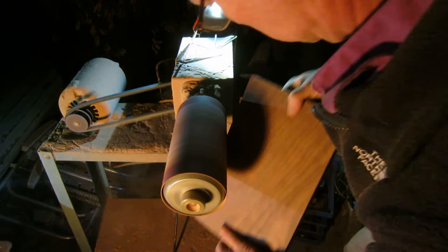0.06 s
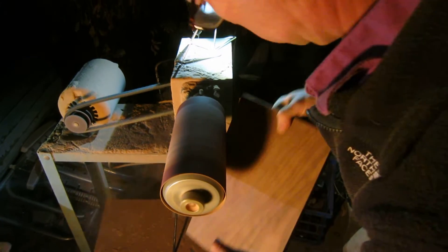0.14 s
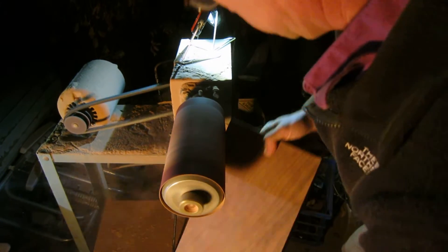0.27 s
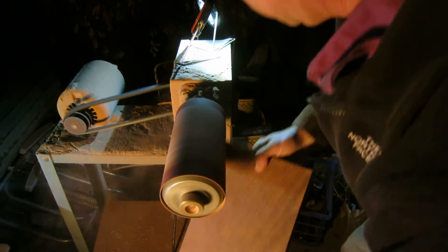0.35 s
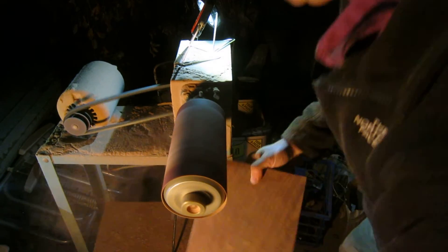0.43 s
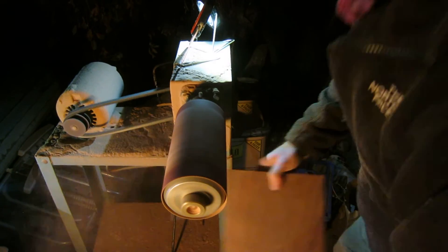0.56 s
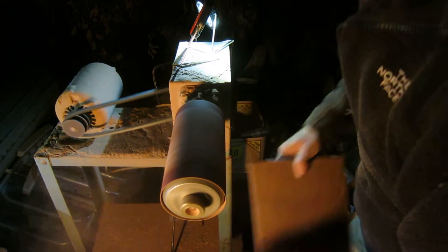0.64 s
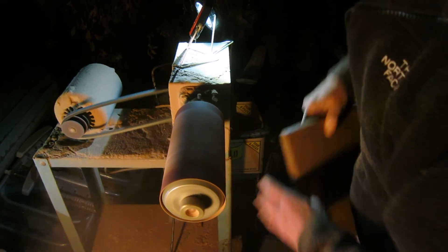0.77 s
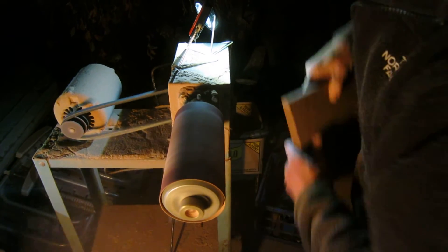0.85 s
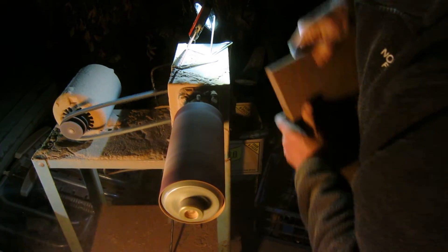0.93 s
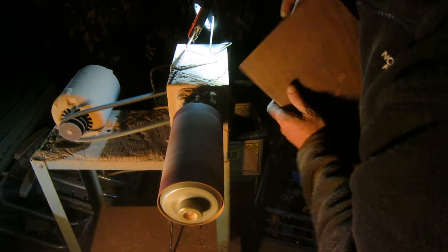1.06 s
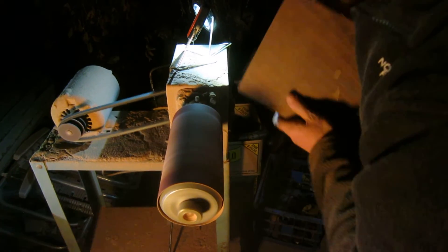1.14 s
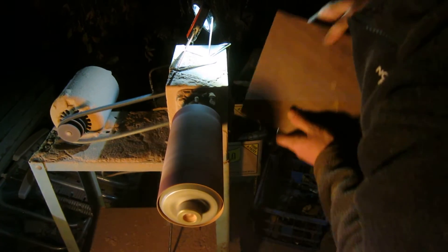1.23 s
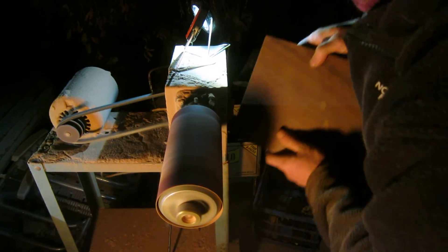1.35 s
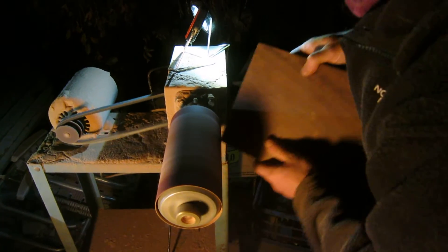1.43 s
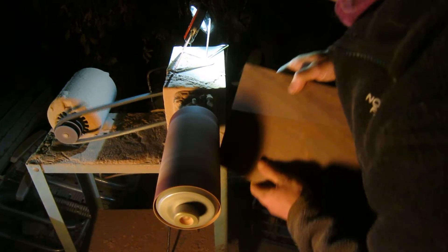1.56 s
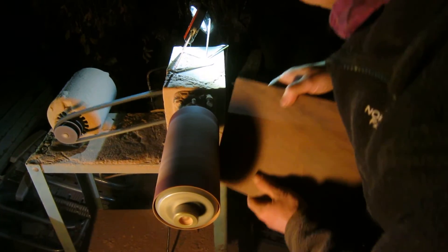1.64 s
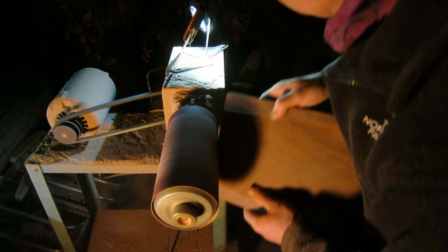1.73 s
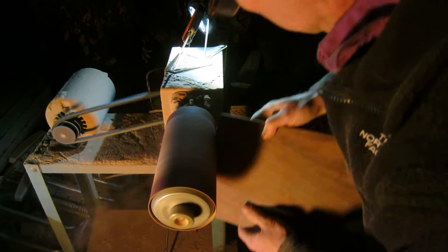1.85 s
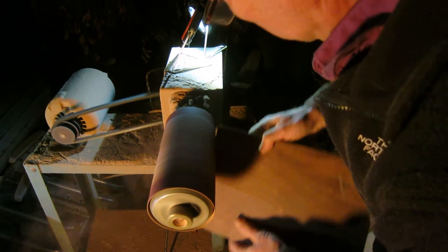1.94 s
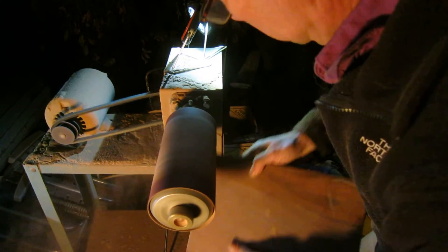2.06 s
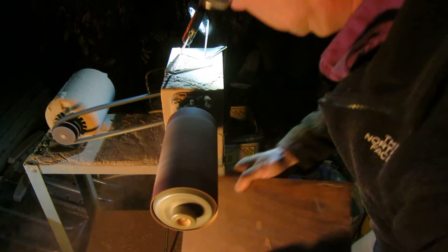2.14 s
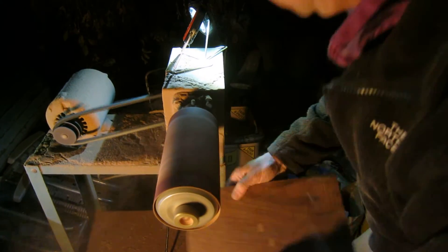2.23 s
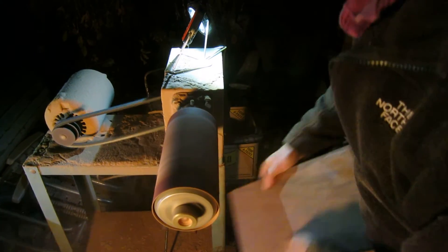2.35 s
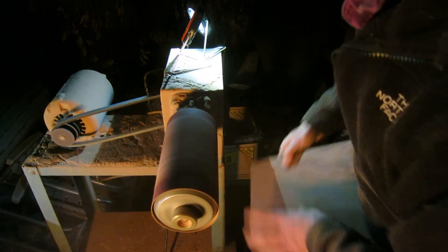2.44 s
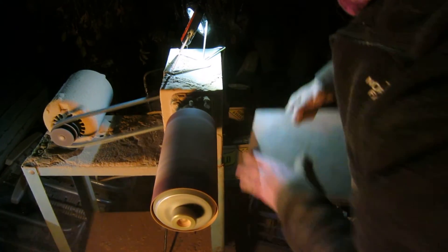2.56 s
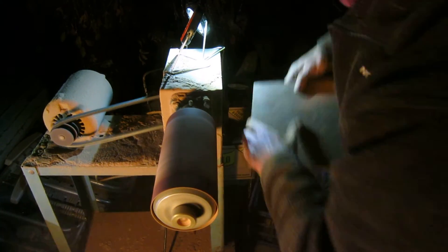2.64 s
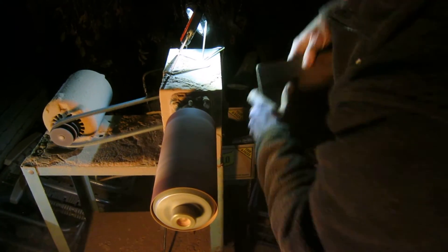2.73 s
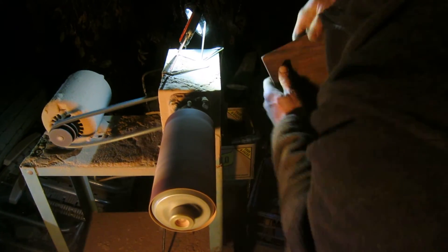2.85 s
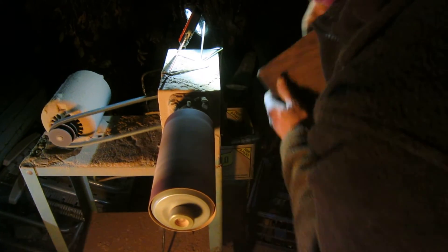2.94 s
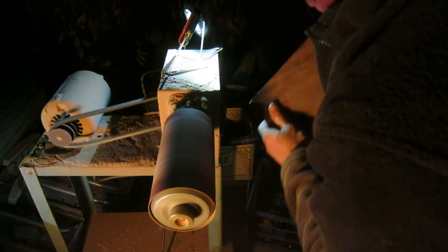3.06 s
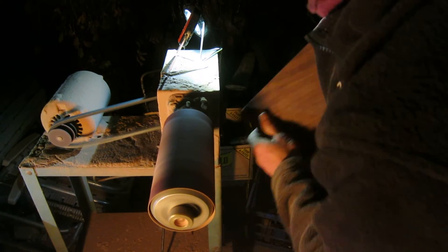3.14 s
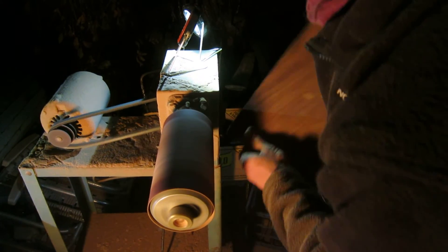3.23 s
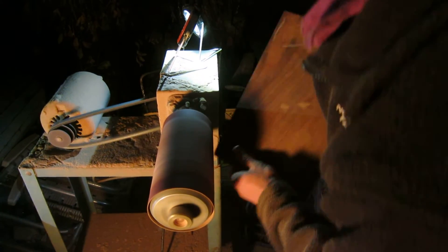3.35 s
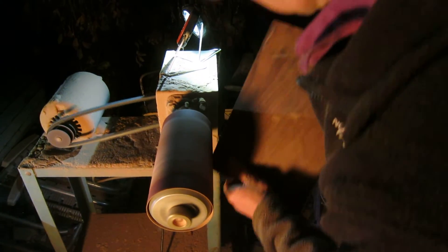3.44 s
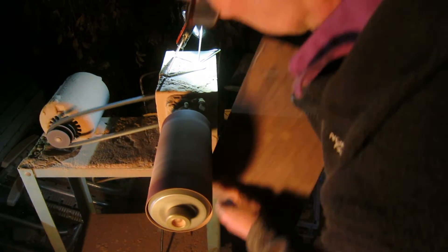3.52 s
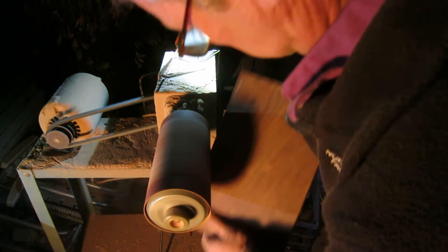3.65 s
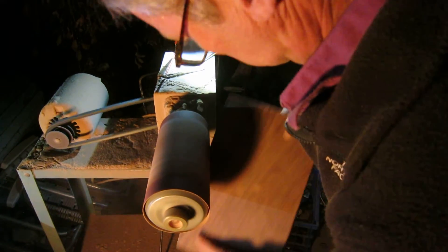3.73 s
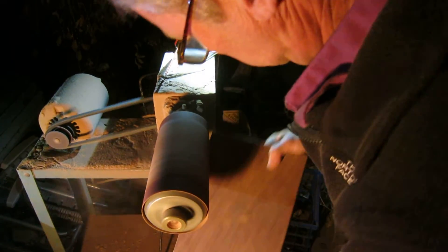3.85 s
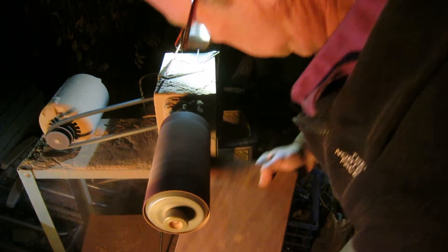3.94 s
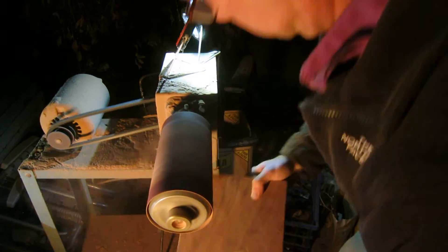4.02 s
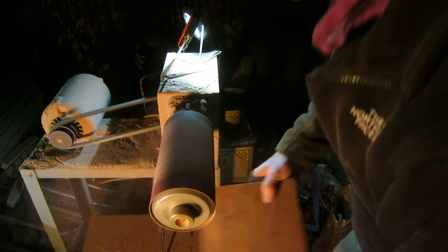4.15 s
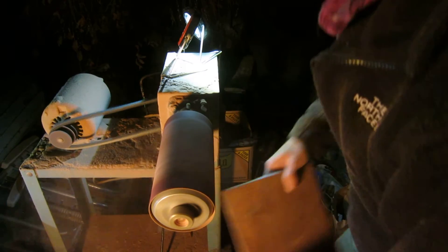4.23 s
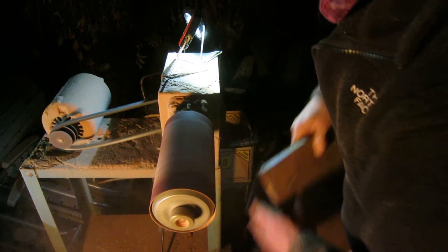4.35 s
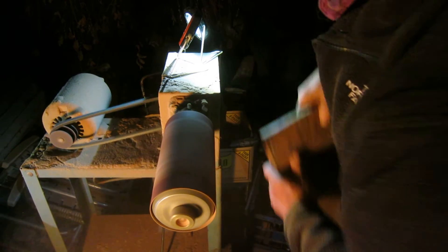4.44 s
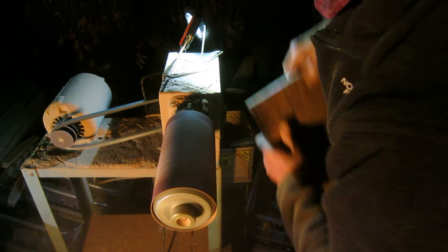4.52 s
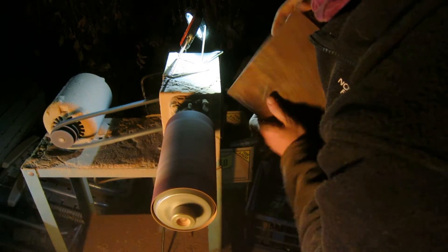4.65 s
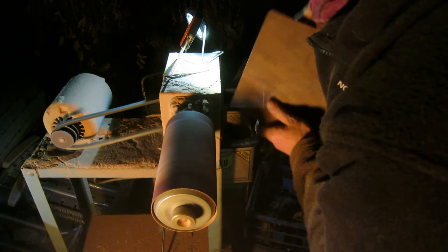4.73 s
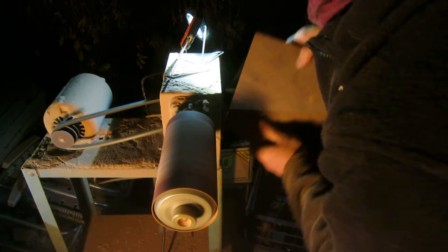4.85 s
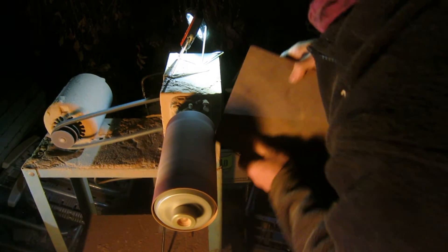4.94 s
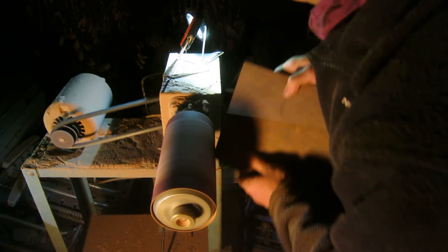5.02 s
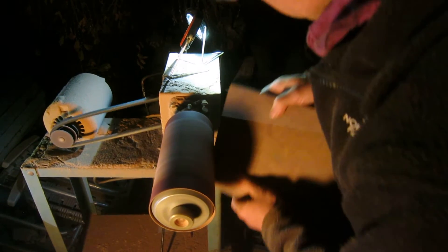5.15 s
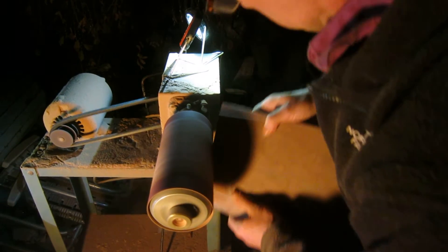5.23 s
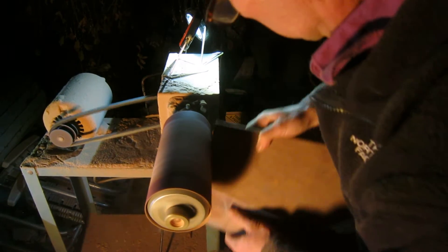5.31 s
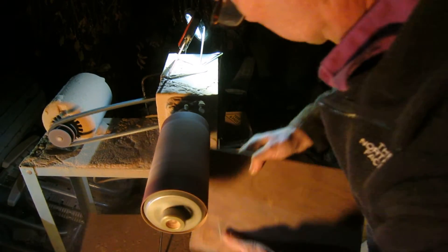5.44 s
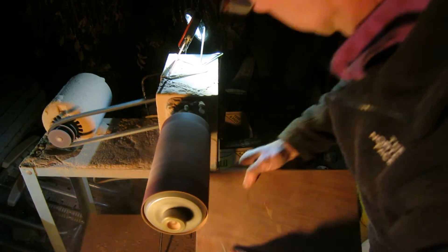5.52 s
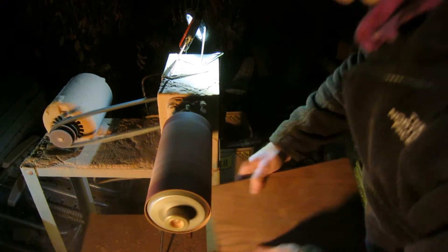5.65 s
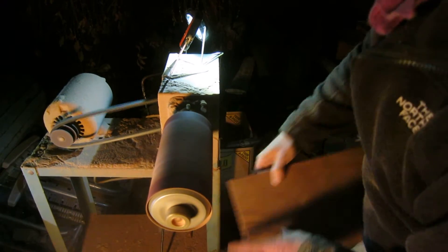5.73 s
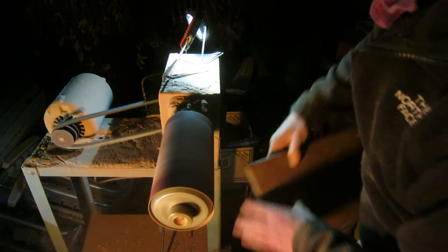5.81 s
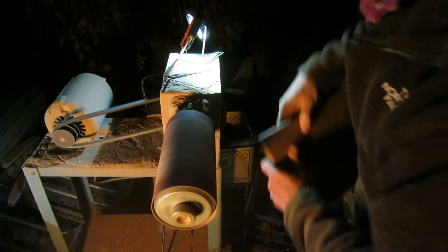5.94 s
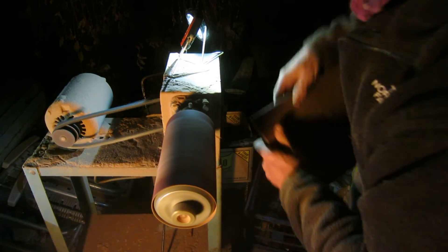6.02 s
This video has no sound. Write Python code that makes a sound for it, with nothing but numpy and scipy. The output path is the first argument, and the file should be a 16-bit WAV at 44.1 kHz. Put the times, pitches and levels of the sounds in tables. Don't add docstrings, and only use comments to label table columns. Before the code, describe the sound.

Close by in the open air, a belt-driven sanding drum rattles and hums steadily. A stroke already under way rasps harshly on a wooden board and stops; three more bright, tearing strokes of about half a second follow at intervals. Between them the machine's knocking frame, belt slaps and airy whirr come forward, with small dry ticks of fingers on the board. The recorder's level dips under each stroke and slowly recovers.

```python
import sys
import numpy as np
from scipy import signal
from scipy.fft import rfft, irfft
from scipy.io import wavfile
from scipy.ndimage import uniform_filter1d

SR = 44100
rng = np.random.default_rng(int(sys.argv[2]) if len(sys.argv) > 2 else 0)


def generate_wav(signal):
    frames = np.transpose(np.atleast_2d(signal))
    scaled = np.clip(frames, -1, 1) * 32767
    pcm = np.round(scaled).astype(np.int16)
    wavfile.write(sys.argv[1], SR, pcm)


def volts_from_db(level):
    exponent = np.asarray(level, float) / 20
    return 10 ** exponent


N = 268168
COARSE = np.arange(0, N, 64)

# time in seconds, grit level in dB, rasp centre in Hz.
STROKES = [
    [(0.0, -16.5, 5000), (0.09, -18.5, 5240), (0.14, -17, 5270), (0.3, -17.5, 4550), (0.365, -18.5, 4480),
     (0.4, -28.5, 4600), (0.44, -34.5, 5000), (0.449, -43, 5000)],
    [(1.522, -18, 5370), (1.54, -19, 5400), (1.645, -17.5, 5450), (1.76, -21, 4800), (1.84, -16.5, 4480),
     (2.028, -17, 4900), (2.088, -26, 4830), (2.168, -39, 5130), (2.185, -73, 4850)],
    [(3.388, -29, 4880), (3.452, -23.5, 5400), (3.5, -16, 5350), (3.54, -19, 5270), (3.872, -16, 4850),
     (3.962, -19, 3800), (3.99, -31, 3820), (4.072, -41.5, 4390), (4.11, -71, 3940)],
    [(5.027, -25.5, 5190), (5.049, -23.5, 5400), (5.13, -17, 5200), (5.213, -16, 5100), (5.34, -20, 4200),
     (5.43, -19, 4540), (5.495, -23, 4400), (5.531, -37, 5100), (5.543, -51, 5010)],
]
# start in seconds, length in seconds, grit level in dB, rasp centre in Hz.
BOUNCES = [
    (0.454, 0.031, -36, 5380),
    (1.461, 0.048, -19.5, 5200),
    (4.951, 0.052, -22, 4700),
    (5.553, 0.022, -37, 3740),
]
# from time in seconds, boom in dB, mid ring in dB, top hiss in dB,
# top lost along the pass in dB.
PASSES = [
    (0, 0.7, -.1, -3.5, -8),
    (1.0, -0.1, 0.7, -0.4, 6),
    (2.8, -0.2, 1.8, -1.4, 9.5),
    (4.5, 1.5, 1.3, -0.6, 4),
]
# frequency in Hz, level in dB per Hz.
GRIT_SPECTRUM = [(350, -51), (600, -38), (660, -6.5), (917, -4.5), (1440, -4.5), (1920, -7.5), (2390, -3.5),
                 (2630, -4), (3320, -2.5), (5140, -2.5), (6320, -3.5), (7140, -2), (10600, -10),
                 (14600, -23.5), (15800, -52)]
COLUMN_HZ = [1150, 2500, 4800, 10000]
# start in seconds, length in seconds, frequency in Hz, width in Hz,
# level in dB.
EDGE_RINGS = [(.10, .09, 3460, 200, -23.5), (0.231, 0.12, 4000, 151, -23.5), (0.318, 0.17, 1840, 90, -37),
              (0.336, 0.08, 6670, 250, -25), (0.37, 0.066, 960, 80, -37), (1.457, 0.055, 2350, 150, -29),
              (1.52, 0.29, 5600, 350, -22.5), (1.574, 0.033, 3040, 150, -25),
              (2.044, 0.025, 3260, 150, -21), (3.46, 0.065, 3280, 150, -24),
              (3.464, 0.08, 2860, 150, -23.5), (3.615, 0.17, 2380, 90, -27), (3.878, 0.11, 3550, 300, -19),
              (3.918, 0.082, 1066, 89, -30), (3.893, 0.05, 7300, 300, -28), (4.961, 0.043, 1100, 120, -30),
              (5.028, 0.15, 5750, 250, -23.5), (5.06, 0.072, 3240, 200, -25.5),
              (5.316, 0.16, 3250, 250, -25), (5.406, 0.16, 740, 101, -36.5),
              (5.482, 0.17, 850, 70.4, -37.5), (0.448, .035, 5500, 150, -40),
              (2.02, 0.087, 11000, 400, -27), (5.55, 0.027, 3360, 150, -42)]
# time in seconds, peak in dB, centre in Hz.
TICKS = [(0.7028, -30, 3500), (0.8994, -31, 4770), (1.0694, -31, 6740), (1.27, -51, 4790),
         (1.4324, -18.5, 3840), (2.6285, -33, 5750), (2.6653, -29.5, 3840), (2.7094, -43, 4000),
         (2.7751, -30, 4760), (2.8294, -30, 4730), (2.877, -28, 3950), (2.9144, -39, 4730),
         (2.9903, -30, 4800), (3.0401, -25, 4860), (3.305, -27, 3710), (3.3243, -25.5, 3930),
         (3.3486, -25, 4380), (4.2676, -30.5, 3920), (4.2994, -42, 4030), (4.385, -32, 5940),
         (4.4218, -34, 4720), (4.4538, -32, 3930), (4.4887, -30, 5930), (4.5232, -32, 3960),
         (4.6034, -31, 3940), (4.6284, -33, 3980), (4.7494, -36, 5850), (4.7894, -37, 3890),
         (4.8623, -23, 3880), (5.5962, -31, 4760)]
# frequency in Hz, width in Hz, level in dB, share of the guard buzz.
FRAME_MODES = [(200, 100, -10, 0.26), (250, 70, -9.5, 1), (309, 26.4, 3, 5), (394, 47, -2, 0.58),
               (424.6, 26.4, -2.5, 0.56), (517, 33, -1.5, 1.1), (558.6, 22.5, -2.5, 1.1),
               (621.6, 29, -2, 1.1), (753.4, 35.5, -4, 1), (798, 36, -4.5, 1), (863.5, 52, -5.5, 0.8),
               (1100, 18, -11, 0.6), (1143, 28, -3, 0.7), (1218, 26, -3, 0.55), (1304, 84, -8, .95),
               (1424, 39, -4.5, 0.86), (2272, 120, -14.5, 0.64), (2477, 39, -11.5, 0.5),
               (2612, 71, -9, 0.3), (3920, 210, -23.5, 0.5), (4790, 170, -21, 0.6)]
# time in seconds, level in dB.
SHAKE = [(0.0, -38), (0.3, -48), (0.56, -41.5), (1.68, -35.5), (1.71, -59), (1.76, -42), (2.15, -46),
         (2.24, -40), (3.18, -40), (3.22, -34.5), (4.03, -47.5), (4.33, -40.5), (5.01, -41.5), (5.05, -35),
         (5.35, -48), (5.69, -43.5), (5.84, -36.5), (6.08, -37.5)]
# time in seconds, peak in dB.
SLAPS = [(0.631, -19), (0.719, -33), (0.899, -24), (1.083, -38), (1.169, -21), (1.358, -28), (2.393, -18),
         (2.47, -23), (2.579, -27), (2.659, -43), (2.773, -18), (2.853, -22), (2.962, -24), (3.037, -15),
         (3.11, -15), (3.35, -17), (4.484, -14), (4.569, -36), (4.669, -38), (4.819, -24), (5.718, -26),
         (5.819, -21), (5.919, -42)]
# frequency in Hz, level in dB rel hum.
MOTOR_LINES = [(91, -2), (119.9, 0), (239.8, -1.5)]
# frequency in Hz, width in Hz, level in dB rel hum.
BENCH_MODES = [(61.6, 28, -11.5), (90, 15, -7.5), (155.2, 7.1, -5)]
# frequency in Hz, level in dB per Hz.
WHIRR_SPECTRUM = [(120, -44), (300, -1.5), (700, -25), (1000, -15), (1700, -17.5), (3150, -18.5),
                  (4250, -24), (5500, -23), (6880, -24), (9000, -29.5), (11300, -36), (13500, -46),
                  (15000, -60)]
# frequency in Hz, level in dB per Hz.
OUTDOORS_SPECTRUM = [(30, -30), (70, -14), (600, -15), (1020, -16.5), (1400, -8.5), (2040, -21),
                     (2630, -13), (3700, -25), (5000, -17), (8000, -18), (11000, -29), (12000, -45),
                     (15000, -55)]
# frequency in Hz, left over right in dB, right phase lead in rad,
# unshared sound in dB.
PORTS = [(30, -.5, 0, -30), (120, -1, -0.142, -29), (300, 0, -0.058, -24), (1080, -0.5, 0.051, -49),
         (1480, -3, 0.23, -24), (1460, 1.5, 0.41, -28), (4200, 0, -0.053, -24), (5350, -1, -0.071, -20),
         (6200, 0, -0.14, -28), (7300, -1, -0.52, -22), (8200, 2.5, -0.62, -15.5), (10000, 7, 0, -13.5),
         (11500, 3.5, .15, -13), (12400, 4, 0.14, -11), (15000, -4, .05, -28)]

DRUM_PER_S, BELT_PER_S = 26.6, 10.8
FULL_GRIT_DB, LIGHTEST_DB = -16.5, 12.5
BOOM_DB, MID_DB, TOP_DB = -4.5, -3.5, -1
BOOM_GAINS, MID_GAINS, TOP_GAINS = 1, 0.96, 0.77
BOOM_FADES_DB, MID_FADES_DB = 4.3, 1.5
BOUNCE_RISE_S, BOUNCE_FALL_S, BOUNCE_SAG_DB, BOUNCE_EDGE_DB = 0.0032, 0.0087, 5, 17
SNAGS_PER_S, SNAG_DB, SNAG_HZ = 700, -8.5, 5500
KNOCK_DB, KNOCK_S = 1.5, 0.004
GUARD_DB, HUM_DB, WHIRR_DB, OUTDOORS_DB = -36.5, -45, -48, -55
GUARD_STEADY, HUM_FOLLOWS = 0.74, 0.32
LOAD_DAMPS_DB = 10
DUCK_DB, DUCK_S, RECOVER_S = 5.5, 0.15, 0.49
EARLIER_S = 0.1


def sanding():
    grit_db, rasp_hz = contact()
    rasp_hz = rasp_hz[COARSE]
    passed, knock_db = travel()
    tilt_db = contact_colour(grit_db[COARSE], passed)
    tears = [grains(15000, 2.3) for _ in range(3)]
    board = np.zeros(N)
    for k, hz in enumerate(np.geomspace(640, 15700, 60)):
        place = np.interp(np.log(hz), np.log(COLUMN_HZ), np.arange(4))
        low = min(int(place), 2)
        shade_db = tilt_db[low] + (place - low) * (tilt_db[low + 1] - tilt_db[low])
        rasp_db = 4.46 * np.exp(-(np.log(hz / rasp_hz) / 0.18) ** 2)
        level_db = at_hz(GRIT_SPECTRUM, hz) + shade_db + rasp_db + 2.07 * drift(2.85)
        mode = resonate(resonate(tears[k % 3], hz, 0.071 * hz), hz, 0.083 * hz)
        board += gain_of(level_db) * mode * (-1) ** k
    core = filtered(board, 2, [3500, 6500], "band")
    board = filtered(board, 4, 640, "high")
    evened = board / np.sqrt(uniform_filter1d(core ** 2, size=3000))
    evened += volts_from_db(SNAG_DB) * rms_one(resonate(grains(SNAGS_PER_S, 2.8), SNAG_HZ, 0.61 * SNAG_HZ))
    evened *= gain_of(knock_db)
    chatter = gain_of(0.8 * drift(24) + 0.35 * throb(DRUM_PER_S, 0.3))
    pressure = signal.lfilter([0.03], [1, -0.97], volts_from_db(grit_db))
    return pressure * chatter * evened


def contact():
    spans = [list(map(tuple, stroke)) for stroke in STROKES]
    for s, length_s, db, hz in BOUNCES:
        sagged_db = db - BOUNCE_SAG_DB
        spans.append([(s, db - BOUNCE_EDGE_DB, hz),
                      (s + BOUNCE_RISE_S, db, hz),
                      (s + length_s - BOUNCE_FALL_S, sagged_db, hz),
                      (s + length_s, sagged_db - BOUNCE_EDGE_DB, hz)])
    return in_time([np.array(span) for span in sorted(spans)])


def contact_colour(grit_db, passed):
    light_db = np.minimum(FULL_GRIT_DB - grit_db, LIGHTEST_DB)
    passes = np.array(PASSES)
    current = np.searchsorted(passes[1:, 0], COARSE / SR)
    grain_boom, grain_mid, grain_top, top_lost = passes[current, 1:].T
    along = passed - 0.5
    boom = BOOM_DB + BOOM_GAINS * light_db + grain_boom - BOOM_FADES_DB * along
    mid = MID_DB + MID_GAINS * light_db + grain_mid - MID_FADES_DB * along
    top = TOP_DB + TOP_GAINS * light_db + grain_top - top_lost * along
    return np.array([boom, mid, 0 * light_db, top])


def stroke_spans():
    return [(stroke[0][0] - EARLIER_S * (k == 0), stroke[-1][0]) for k, stroke in enumerate(STROKES)]


def travel():
    t, spans = COARSE / SR, stroke_spans()
    corners_s = np.ravel([(start, end, end + 0.2) for start, end in spans])
    passed = np.interp(t, corners_s, [0, 1, 1] * len(spans))
    landings = [start for start, _ in spans] + [row[0] for row in BOUNCES]
    knock_db = sum(KNOCK_DB * np.exp(-np.maximum(t - s, 0) / KNOCK_S) * (t >= s) for s in landings)
    return passed, knock_db


def edge_rings():
    out, tears = np.zeros(N), grains(20000, 3.4)
    for s, length_s, hz, width_hz, level_db in EDGE_RINGS:
        at, size = round(s * SR), round(length_s * SR)
        ring = resonate(resonate(tears[at:at + size], hz, width_hz), hz, 1.6 * width_hz)
        ring = rms_one(steadied(ring, size=700, share=0.96))
        out[at:at + size] += volts_from_db(level_db) * ring * np.hanning(size) ** 0.32
    return out


def machine():
    rattle_db = uniform_filter1d(in_time([np.array(SHAKE)])[0][COARSE], size=50)
    duck = ducking()
    guard_db = GUARD_STEADY * (GUARD_DB - DUCK_DB * duck - rattle_db)
    hum_db = HUM_DB + HUM_FOLLOWS * (rattle_db - GUARD_DB)
    damping_db = LOAD_DAMPS_DB * duck ** 1.6
    drum, belt = throb(DRUM_PER_S, 0.31), throb(BELT_PER_S, 0.056)
    slap_db = 20 * np.log10(1 + slaps())
    knocks = [grains(2500, 2.87) for _ in range(2)]
    frame = np.zeros(N)
    for k, (hz, width_hz, level_db, share) in enumerate(FRAME_MODES):
        buzzing = share * (abs(hz - 313) > 25)
        belt_db = 0.9 if hz < 700 else 0.7
        swell_db = 0.58 * drum + belt_db * belt + 1.9 * drift(15)
        swell_db = swell_db + buzzing * (guard_db + slap_db) - damping_db * (450 < hz < 600)
        ring = resonate(resonate(knocks[k % 2], hz, width_hz * 1.18), hz, width_hz * 2.7)
        frame += volts_from_db(level_db) * gain_of(swell_db) * steadied(ring, size=2500, share=0.24) * (-1) ** k
    main = filtered(frame, 2, [272, 350], "band")
    frame = frame / np.sqrt(np.mean(main ** 2))
    return gain_of(rattle_db - 0.53) * frame + gain_of(hum_db - 2.0) * hum()


def slaps():
    t = COARSE / SR
    return sum(volts_from_db(peak_db + 17) * np.exp(-np.maximum(t - s, 0) / 0.023) * (t >= s) for s, peak_db in SLAPS)


def hum():
    t, out = np.arange(N) / SR, np.zeros(N)
    for hz, level_db in MOTOR_LINES:
        out += volts_from_db(level_db) * np.sin(2 * np.pi * hz * t) * gain_of(0.93 * drift(12.0))
    for hz, width_hz, level_db in BENCH_MODES:
        sway = resonate(resonate(rng.standard_normal(N), hz, width_hz), hz, 3.3 * width_hz)
        out += volts_from_db(level_db) * rms_one(sway)
    return out


def ticks():
    size = 900
    out, t = np.zeros(N + size), np.arange(size) / SR
    for s, peak_db, hz in TICKS:
        burst = rng.standard_normal(size) * np.exp(-t / 0.0057)
        snap = resonate(burst, hz, 0.81 * hz)
        at = round(s * SR)
        out[at:at + size] += volts_from_db(peak_db - 1.0) * snap / np.abs(snap).max()
    return filtered(out[:N], 3, 9500, "low")


def whirr():
    level_db = WHIRR_DB - DUCK_DB * ducking()
    air = coloured(grains(12000, 2.1), WHIRR_SPECTRUM)
    top = filtered(air, 4, [5200, 12000], "band")
    return gain_of(level_db + 1.17 * drift(38) - 0.56) * air / np.sqrt(np.mean(top ** 2))


def outdoors():
    return volts_from_db(OUTDOORS_DB) * rms_one(coloured(rng.standard_normal(N), OUTDOORS_SPECTRUM))


def ducking():
    t, out = COARSE / SR, 0
    for start, end in stroke_spans():
        sunk = 1 - np.exp(-np.clip(t - start, 0, end - start) / DUCK_S)
        out = out + sunk * np.exp(-np.maximum(t - end, 0) / RECOVER_S)
    return out


def grains(per_s, spread_db):
    sizes = volts_from_db(spread_db * np.minimum(rng.exponential(1, N), 5)) * rng.choice([-1, 1], N)
    return rms_one(sizes * (rng.random(N) < per_s / SR) + 1e-9)


def resonate(x, hz, width_hz):
    r = np.exp(-np.pi * width_hz / SR)
    poles = [1, -2 * r * np.cos(2 * np.pi * hz / SR), r * r]
    return signal.lfilter([(1 - r * r) / 2, 0, (r * r - 1) / 2], poles, x)


def steadied(ring, size, share):
    power = uniform_filter1d(ring ** 2, size=size)
    return ring * (np.mean(power) / (power + 1e-20)) ** (share / 2)


def throb(per_s, sharp):
    phase = 2 * np.pi * per_s * COARSE / SR + 0.35 * drift(1.2)
    return np.cos(phase) + sharp * np.cos(2 * phase)


def drift(rate_hz):
    r = np.exp(-128 * np.pi * rate_hz / SR)
    noise = rng.standard_normal(len(COARSE) + 1000)
    return rms_one(signal.lfilter([1], [1, -2 * r, r * r], noise)[1000:])


def gain_of(db):
    return np.interp(np.arange(N), COARSE, volts_from_db(db))


def in_time(tables, silent_db=-120):
    t, rows = np.arange(N) / SR, np.concatenate(tables)
    columns = [np.interp(t, rows[:, 0], column) for column in rows.T[1:]]
    inside = sum((t >= table[0][0]) & (t <= table[-1][0]) for table in tables) > 0
    columns[0] = np.where(inside, columns[0], silent_db)
    return columns


def at_hz(points, hz, column=1):
    points = np.array(points)
    return np.interp(np.log(hz), np.log(points[:, 0]), points[:, column])


def coloured(x, spectrum):
    hz = np.maximum(np.fft.rfftfreq(N, 1 / SR), 1)
    return irfft(rfft(x) * volts_from_db(at_hz(spectrum, hz)), N)


def filtered(x, order, hz, kind):
    return signal.sosfilt(signal.butter(order, hz, kind, fs=SR, output="sos"), x)


def rms_one(x):
    return x / np.sqrt(np.mean(x ** 2) + 1e-20)


def scene():
    front = sanding() + edge_rings() + machine() + ticks() + whirr()
    sides = outdoors()
    return np.array([front + sides, front - sides])


def roll_off(x):
    return signal.sosfilt(signal.butter(12, 16490, fs=SR, output="sos"), x)


def record(dry):
    hz = np.maximum(np.fft.rfftfreq(N, 1 / SR), 1)
    scatter = rng.standard_normal(2600) * np.exp(-np.arange(2600) / SR / 0.022)
    scatter /= np.sqrt(np.sum(scatter ** 2))
    unshared = rfft(scatter, N) * volts_from_db(at_hz(PORTS, hz, column=3))
    half = volts_from_db(at_hz(PORTS, hz) / 2) * np.exp(-0.5j * at_hz(PORTS, hz, column=2))
    ports = np.array([half + unshared, 1 / half - unshared])
    ports /= np.abs(half + 1 / half) / 2
    ports /= 1 + (hz / 15400) ** 60 + (48 / hz) ** 3
    rounded = 0.94 * np.tanh(dry / 0.98)
    mix = irfft(rfft(rounded, axis=1) * ports, N, axis=1)
    return roll_off(mix)


dry = scene()
out = record(dry)
generate_wav(out)
```